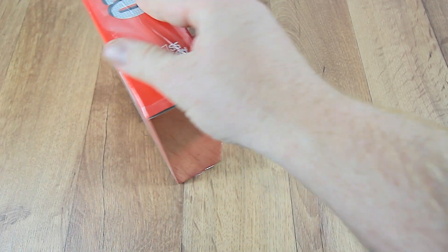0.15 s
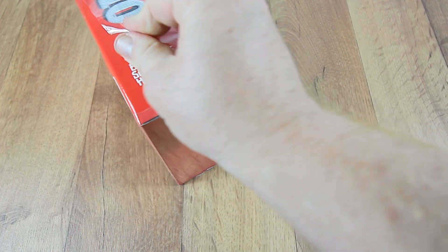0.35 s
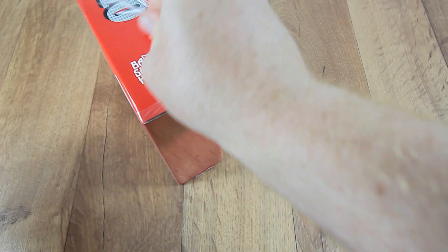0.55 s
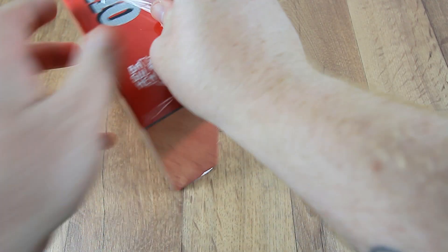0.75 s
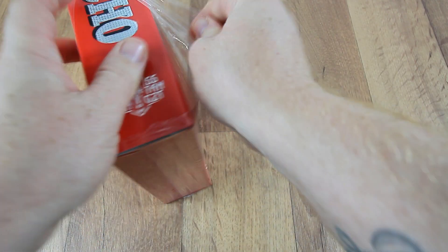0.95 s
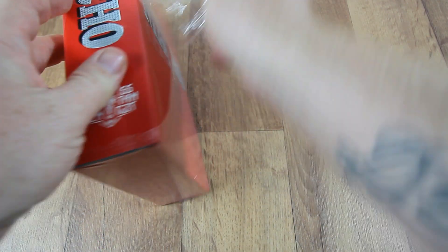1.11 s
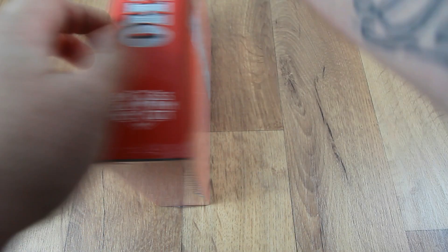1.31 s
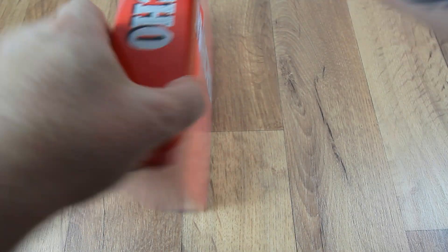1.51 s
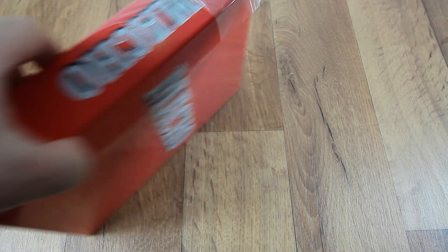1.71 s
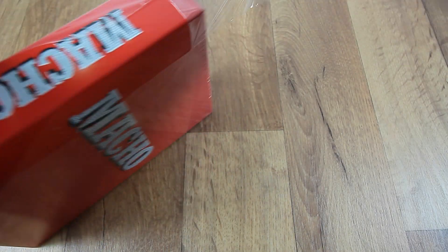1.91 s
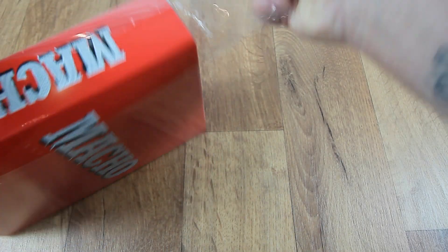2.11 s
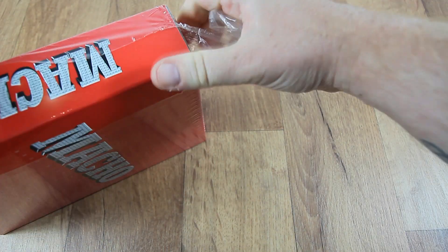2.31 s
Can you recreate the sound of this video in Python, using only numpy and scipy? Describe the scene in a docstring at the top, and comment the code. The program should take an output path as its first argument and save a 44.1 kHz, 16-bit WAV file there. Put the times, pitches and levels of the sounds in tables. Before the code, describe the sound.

Plastic wrap peeled from a hollow cardboard box, close in a small quiet room. Fingers hiss over tight film with small ticks, and a hollow knock on wood lands at 0.4 s with low rumbling. From 0.75 s film crackles in uneven spurts, with duller box bumps near 1.2 and 1.37 s. Brightest crackle and sharp snaps come at 1.63-1.95 s, a hard pop at 1.83, then sparse crinkles until 2.35 s.

```python
"""Peeling film from a hollow box

Fingers slide over a shrink-wrapped cardboard box, tip it against a wooden floor and peel the film off.
Sliding is filtered noise; the film's snaps are noise bursts, its crackle random clicks over friction hiss,
its pops and wrinkles decaying sines. The box knocks and rumbles through a bank of decaying modes.
Close microphone, small quiet room: one floor reflection, a short tail and faint room tone."""
import sys
import numpy as np
from scipy import signal
from scipy.fft import rfft, irfft
from scipy.io import wavfile
from scipy.ndimage import uniform_filter1d

SR = 44100
rng = np.random.default_rng(int(sys.argv[2]) if len(sys.argv) > 2 else 0)


def inscribe(sig):
    """Save sig as 16-bit PCM at rate SR to the path in sys.argv[1].

    A 1-D sig is mono; a 2-D sig holds one channel per row.
    Samples are clipped to [-1, 1] before scaling.
    """
    pcm = np.round(np.clip(np.atleast_2d(sig).T, -1, 1) * 32767)
    wavfile.write(sys.argv[1], SR, pcm.astype(np.int16))


N = 103635  # length in samples
TOP_HZ = 15900  # upper limit of the recorder

# crackle of the peeling film in three bands, before the gain of each layer:
# t/s, body level/dB, middle level/dB, treble level/dB
PEEL_LEVELS = [(.735,-87,-61,-60),(.77,-43,-47,-43),(.795,-62,-44,-48),(.825,-42.5,-38.5,-37.5),(.9,-49,-43.5,-38.5),(.98,-62,-52.5,-52),(1.02,-52,-46,-44),(1.08,-52,-47,-44),(1.15,-43.5,-43,-43.5),(1.21,-46,-45.5,-41.5),(1.27,-58,-42.5,-40),(1.34,-57,-45,-39),(1.385,-49,-49.5,-51),(1.46,-60,-44,-39),(1.52,-67,-51,-48.5),(1.6,-57,-43,-41.5),(1.635,-44,-34.5,-32.5),(1.685,-44.5,-37,-31),(1.715,-46,-45.5,-38),(1.8,-79,-49,-50),(1.91,-76,-56,-52),(1.95,-48.5,-50,-50),(2,-81,-47.5,-52),(2.06,-79,-48.5,-44),(2.12,-86,-52,-48.5),(2.165,-79,-57,-57),(2.2,-69,-57,-53),(2.32,-92,-57.5,-56.5),(2.35,-48,-57,-53)]
# spectrum of the box's rumble and thud: f/Hz, relative level/dB
BOX_COLOUR = [(30,-38),(60,-7),(90,-1),(130,6.5),(170,-4.5),(250,4),(380,0),(600,-10),(1000,-14.5),(1600,-14),(3000,-40)]


def undb(db):
    """Amplitude ratio from its logarithmic measure in decibels."""
    return 10 ** (np.asarray(db) / 20)


def unit(x):
    """Normalisation to unit root-mean-square amplitude."""
    return x / np.sqrt(np.mean(x ** 2) + 1e-20)


def curve(rows, axis=1):
    """Amplitude envelope: one dB column of a table, interpolated linearly in dB over time."""
    rows = np.array(rows, float)
    return undb(np.interp(np.arange(N) / SR, rows[:, 0], rows[:, axis]))


def colour(x, points):
    """Minimum-phase spectral shaping: folding the cepstrum makes the filter causal."""
    hz, db = np.array(points, float).T
    f = np.maximum(np.fft.rfftfreq(4096, 1 / SR), 1)
    gain = undb(np.interp(np.log(f), np.log(hz), db))
    cepstrum = irfft(np.log(gain))
    half = len(cepstrum) // 2
    fold = np.r_[1, np.full(half - 1, 2), 1, np.zeros(half - 1)]
    response = irfft(np.exp(rfft(cepstrum * fold)))[:half]
    return signal.fftconvolve(x, response)[:len(x)]


def bands(x):
    """Band-pass analysis of a sound into body, middle and treble."""
    edges_hz = (450, 2000, 6000, 17000)
    return [signal.sosfilt(signal.butter(3, pair, btype="band", fs=SR, output="sos"), x)
            for pair in zip(edges_hz, edges_hz[1:])]


def low_pass(x, hz, order=2):
    """Low-pass filtering: a soft contact excites little treble."""
    return signal.lfilter(*signal.butter(order, hz, fs=SR), x)


def high_pass(x, hz):
    """Radiation efficiency: small surfaces radiate little bass."""
    return signal.lfilter(*signal.butter(2, hz, "high", fs=SR), x)


def add(out, s, x):
    """Superposition of a sound that starts at s seconds."""
    i = max(int(s * SR), 0)
    out[i:i + len(x)] += x[:max(N - i, 0)]


def walk(rate):
    """Band-limited fluctuation of unit rms: random steps at a rate in Hz, smoothed over one step."""
    k = int(SR / rate)
    steps = np.repeat(rng.standard_normal(N // k + 1), k)[:N]
    return unit(uniform_filter1d(steps, k))


def buckles():
    """Clustered Poisson process: tiny clicks in short clumps, many weak and a few strong."""
    buckles_per_s, spread_db = 1500, 4.8
    clumps_per_s, clump_db = 160, 6
    rate = undb(clump_db * walk(clumps_per_s))
    hit = rng.random(N) < buckles_per_s / SR * rate / rate.mean()
    size = np.minimum(rng.exponential(size=N), 3.5)
    return hit * rng.choice([-1, 1], N) * undb(spread_db * size)


def slide():
    """Sliding friction: skin on tight film gives a smooth high hiss with some grain."""
    # fingers on the film, before the gain below: t/s, level/dB
    slide_levels = [(0, -65), (0.015, -60), (0.033, -51), (0.07, -50.5), (0.1, -56.5), (0.13, -45),
                    (0.19, -47.5), (0.22, -43.5), (0.28, -46.5), (0.34, -42), (0.375, -48.5), (0.47, -49),
                    (0.51, -45), (0.6, -46), (0.69, -55.5), (0.74, -55)]
    # spectrum of the friction: f/Hz, relative level/dB
    slide_colour = [(400,-24),(1000,-12),(2200,-11.5),(3200,-8),(4600,-2),(6500,-3),(9000,-8.5),(11500,-4.5),(14500,-7),(16000,-12)]
    gain_db = -1
    friction = rng.standard_normal(N) + unit(buckles())
    hiss = unit(colour(friction, slide_colour))
    sliding = np.arange(N) / SR < slide_levels[-1][0]
    return undb(gain_db) * hiss * curve(slide_levels) * sliding


def box_ring():
    """Modal response of the box to a tap; each place of contact weights the modes anew."""
    # modes of the box, before random scatter: f/Hz, level/dB, t60/s
    box_modes = [(126.8,-11.5,0.25),(148,-14.5,0.35),(215,-10,0.48),(256,-2,0.15),(338,-5,0.1),(371.6,-4,0.1),(416,-9.5,0.13),(507,-5.5,0.21),(569,-11,0.16),(655,1,0.055),(815,7,0.029),(1070,5,0.021),(1180,-18.5,0.0057),(1390,6,0.018)]
    mode_scatter = .004  # standard deviation of the relative detuning
    t = np.arange(SR // 2) / SR
    ring = np.zeros(len(t))
    for k, (hz, db, t60) in enumerate(box_modes):
        weight_db, detune = rng.standard_normal(2)
        decay = undb(db + weight_db - 60 * t / t60)
        mode = decay * np.sin(2 * np.pi * hz * (1 + mode_scatter * detune) * t)
        ring += (-1) ** k * mode  # neighbouring modes start in opposite phase
    return ring


def rub():
    """Stick-slip friction: soft hands shift the hollow box unevenly and it rumbles in its lower modes."""
    # box under the hands, before the gains below: t/s, level/dB
    rub_levels = [(0,-62),(.04,-65.5),(.2,-59),(.3,-60),(.385,-48),(.45,-37),(.55,-49),(.68,-63.5),(.76,-57.5),(.84,-45),(.92,-48),(1.03,-56.5),(1.16,-41.5),(1.29,-62),(1.4,-47),(1.45,-52),(1.52,-52),(1.575,-37.5),(1.68,-49.5),(1.77,-45),(1.81,-60.5),(2.03,-56),(2.15,-68.5),(2.35,-74)]
    rumble_db, ring_db = -2, -6
    flutter_db, flutter_hz = 3, 50.17
    soft_hz = 560  # low-pass of the soft contact
    rumble = unit(colour(rng.standard_normal(N), BOX_COLOUR))
    slips = low_pass(buckles(), soft_hz)
    ring = unit(signal.fftconvolve(slips, box_ring())[:N])
    mix = undb(rumble_db) * rumble + undb(ring_db) * ring
    return mix * curve(rub_levels) * undb(flutter_db * walk(flutter_hz))


def snaps():
    """Snap-through instability: a crease flips with a tick and a brief burst, then the sheet shivers and settles."""
    # single snaps, rms over the first 2 ms: t/s, body level/dB, middle level/dB, treble level/dB
    snap_events = [(0.0333,-54.5,-60,-38),(0.136,-77,-38,-32.5),(0.1477,-81,-33.5,-45),(0.1518,-72,-37,-31.5),(0.2497,-59,-33.5,-22.5),(0.3342,-43.5,-36,-43),(0.3954,-35,-18.5,-29.5),(0.4009,-32,-27,-35),(0.4838,-48,-34.5,-57),(0.495,-41,-33,-33),(0.523,-46,-56,-30.5),(.5504,-47,-27.5,-31),(0.5637,-44.5,-35.5,-45),(0.6208,-61,-44,-33.5),(0.7104,-70,-47,-40.5),(0.81,-28,-27,-22),(0.813,-31.5,-47,-45),(0.8452,-34.5,-35,-39),(1.007,-34,-33,-32.5),(1.057,-62,-54,-25.5),(1.086,-40,-30.5,-29),(1.099,-39.5,-40,-38),(1.1448,-57,-43,-35),(1.36,-49,-36,-33.5),(1.4034,-47,-35,-28),(1.451,-62,-36.5,-31),(1.484,-40,-32,-32.5),(1.5266,-40,-34.5,-31),(1.5353,-51,-36,-24),(1.6414,-33,-26.5,-14.5),(1.663,-36.5,-24.5,-18),(1.76,-39,-24.5,-19.5),(1.768,-33.5,-34,-21.5),(1.7758,-33.5,-27.5,-14.5),(1.8333,-37,-22,-14.5),(1.9285,-34,-22.5,-19),(1.945,-52,-30,-33),(1.961,-44,-34,-40),(2.0057,-56,-41,-28.5),(2.0254,-40,-25.5,-24.5),(2.033,-40,-32.5,-23.5),(2.062,-55,-38.5,-42),(2.1817,-54,-45.5,-37),(2.2262,-57,-34,-31.5),(2.3414,-45,-37,-31)]
    # spectrum of a snap: f/Hz, relative level/dB
    snap_colour = [(400,-12),(1000,-3.5),(2100,-9),(4000,4.5),(6300,0),(9000,4),(12000,9),(14000,3.5),(16000,0.5)]
    tick = 1.2 * np.sqrt(2)  # amplitude of the first sample
    burst_s, after_db, after_s = .00027, -23, .002  # times to fall to 1/e
    settle_per_s, settle_db, settle_s = 600, 0.5, 0.0047
    out, t = np.zeros(N), np.arange(2048) / SR
    first = int(.002 * SR)
    for s, *levels in snap_events:
        ticks = rng.random(len(t)) < settle_per_s / SR
        settle = ticks * undb(settle_db) * np.exp(-t / settle_s)
        shiver = undb(after_db) * np.exp(-t / after_s)
        burst = rng.standard_normal(len(t)) * (np.exp(-t / burst_s) + shiver + settle)
        burst[0] = tick
        for db, part in zip(levels, bands(colour(burst, snap_colour))):
            add(out, s, undb(db) * part / np.sqrt(np.mean(part[:first] ** 2)))
    return out


def knocks():
    """Impact excitation: the box bumps the floor with a push, its modes, a dull thud and the struck panel's note."""
    # knocks, before the gain below: t/s, level/dB, low-pass f/Hz, panel f/Hz, panel share/dB
    knock_events = [(0.334,-37,800,391,1),(0.3957,-21,1330,1092,-5.5),(.411,-40,500,330,0),(0.429,-35,900,310,0),(.452,-40.5,900,550,0),(.487,-37,604,407,-1.5),(.85,-44.5,300,130,-4),(1.135,-46,600,202,6),(1.165,-41.5,800,234,-8),(1.202,-34.5,404,224,3),(1.316,-38.5,900,107,-3),(1.372,-28.5,570,284,-3),(1.379,-39,1000,743,-5),(1.46,-43,396,315,-5),(1.586,-42,296,240,-16),(1.61,-41,496,348,-2),(1.685,-45,200,100,2),(1.77,-44.5,880,156,2)]
    gain_db = -2
    push_hz, push_db, push_s, push_low_hz = 436, 15.5, 0.0015, 173
    thud_db, thud_s = -3.5, 0.054
    panel_s, panel_split = 0.0083, 0.047  # time to fall to 1/e, relative offset of the side partials
    out, first = np.zeros(N), int(.02 * SR)
    for s, db, bright_hz, panel_hz, panel_db in knock_events:
        ring = box_ring()
        t = np.arange(len(ring)) / SR
        pulse = np.sin(2 * np.pi * push_hz * t) * np.exp(-t / push_s)
        push = undb(push_db) * high_pass(pulse, push_low_hz)
        rumble = unit(colour(rng.standard_normal(len(t)), BOX_COLOUR))
        thud = undb(thud_db) * rumble * np.exp(-t / thud_s)
        body = low_pass(push + ring / np.std(ring[:first]) + thud, bright_hz)
        partials = [np.sin(2 * np.pi * panel_hz * (1 + side * panel_split) * t) for side in (-1, 0, 1)]
        panel = sum(partials) * np.exp(-t / panel_s)
        x = body / np.std(body[:first]) + undb(panel_db) * panel / np.std(panel[:first])
        add(out, s, undb(db + gain_db) * x / np.std(x[:first]))
    return out


def peel():
    """Buckling and friction: film crackles in spurts, each click with its own tint, and hisses over the card."""
    # spectrum of the peeling film: f/Hz, relative level/dB
    peel_colour = [(250,-11.5),(500,8.5),(1000,-6.5),(2000,-7),(4000,-6.5),(6500,-3.5),(9000,0),(12500,3.5),(14500,0.5),(16000,-8.5)]
    crackle_db, friction_db = (-4, -4, -2.5), (-11.5, -5, -5.5)  # body, middle, treble
    flutter_db, flutter_hz = 2.5, 70
    tint_db = 8  # scale of each click's random gain in a band
    clicks, spurts = buckles(), undb(flutter_db * walk(flutter_hz))
    hiss = bands(colour(rng.standard_normal(N), peel_colour))
    out = np.zeros(N)
    for k in range(len(hiss)):
        tinted = clicks * undb(tint_db * rng.uniform(-0.71, 1, N))
        crackle = bands(colour(tinted, peel_colour))[k]
        mix = undb(crackle_db[k]) * unit(crackle) + undb(friction_db[k]) * unit(hiss[k])
        out += curve(PEEL_LEVELS, axis=k + 1) * mix
    peeling = np.arange(N) / SR > PEEL_LEVELS[0][0]
    return out * spurts * peeling


def wrinkles():
    """Damped free vibration: larger wrinkles flip at random in the peel, each ringing briefly at its own pitch."""
    count = int(450 * N / SR)
    low_hz, high_hz = 870, 5600
    decay_cycles = 1.6  # cycles to fall to 1/e
    spread_db, gain_db = 4, -8
    out, t = np.zeros(N), np.arange(512) / SR
    start, end = PEEL_LEVELS[0][0], PEEL_LEVELS[-1][0]
    for when, pitch, size in rng.random((count, 3)):
        hz = low_hz * (high_hz / low_hz) ** pitch
        db = spread_db * min(-np.log(1 - size), 3)
        ring = np.sin(2 * np.pi * hz * t) * np.exp(-hz * t / decay_cycles)
        # the root of pitch offsets the shorter ring of high wrinkles
        add(out, start + when * (end - start), undb(db) * np.sqrt(hz) * ring)
    return undb(gain_db) * unit(out) * curve(PEEL_LEVELS, axis=2)


def pops():
    """Membrane vibration: taut film lets go with a short crack and rings for milliseconds like a tiny drumhead."""
    # hollow pops, before gain and scatter: t/s, level/dB, pitch f/Hz,
    # bass limit f/Hz (higher where the film has left the card)
    pop_events = [(.776,-18,2920,890),(0.8052,-19.5,2320,593),(0.9794,-31,2880,600),(1.0045,-28,2400,500),(1.2331,-25.5,3600,900),(1.5725,-20,3670,600),(1.5975,-20,2680,606),(1.8334,-11.5,3930,3100),(1.9287,-16,4380,2290),(1.9435,-30,4200,2500)]
    # modes of the taut film: ratio to the pitch, level/dB, t60/s
    film_modes = [(.27,-22,0.0057),(.42,-9,0.008),(.6,-16,0.0042),(.85,-1,0.0052),(1,8,0.0044),(1.25,4,0.0056),(1.65,1,0.0034),(2.2,-18,0.0022)]
    gain_db, crack_db, crack_s = 6, -19, .0004
    scatter = .03  # standard deviation of the relative detuning
    top_ratio = 1.84  # low-pass cutoff over pitch
    out, t = np.zeros(N), np.arange(1024) / SR
    for s, db, pitch_hz, low_hz in pop_events:
        ring = np.zeros(len(t))
        for ratio, mode_db, t60 in film_modes:
            hz = pitch_hz * ratio * (1 + scatter * rng.standard_normal())
            ring += undb(mode_db - 60 * t / t60) * np.sin(2 * np.pi * hz * t)
        ring = low_pass(ring, top_ratio * pitch_hz, order=4)
        crack = undb(crack_db) * rng.standard_normal(len(t)) * np.exp(-t / crack_s)
        add(out, s, undb(db + gain_db) * high_pass(ring / np.abs(ring).max() + crack, low_hz))
    return out


def room(x):
    """Reflection and reverberation: one bounce off the floor, then a short tail whose treble dies first."""
    floor_lag_s, floor_gain = .0028, .14
    # band edges in Hz, level in dB, t60 in s
    tails = [((350, 3200), -10.5, 0.23), ((3200, 17000), -14.5, .2)]
    t = np.arange(SR // 2) / SR
    response = np.zeros(len(t))
    response[0], response[int(floor_lag_s * SR)] = 1, floor_gain
    for edges_hz, db, t60 in tails:
        tail = rng.standard_normal(len(t)) * np.exp(-np.log(1000) * t / t60) * (t > floor_lag_s)
        tail /= np.linalg.norm(tail)
        response += undb(db) * signal.lfilter(*signal.butter(2, edges_hz, "band", fs=SR), tail)
    return signal.fftconvolve(x, response)[:N]


def room_tone():
    """Stationary background noise: a faint steady tone of the room."""
    # spectrum of the room tone: f/Hz, relative level/dB
    tone_colour = [(25, -36), (130, 14), (300, 11), (1000, -2), (5000, -5), (16000, -60)]
    return undb(-67.5) * unit(colour(rng.standard_normal(N), tone_colour))


def scene():
    """Superposition of film and box in the room, over faint room tone."""
    hands = slide() + rub()
    film = snaps() + peel() + wrinkles() + pops()
    return (room(hands + film + knocks()) + room_tone())[None]


def record(dry):
    """Band limitation: the recorder cuts the top with a steep elliptic low-pass."""
    return signal.sosfilt(signal.ellip(8, .2, 70, TOP_HZ, fs=SR, output="sos"), dry)


dry = scene()
out = record(dry)
inscribe(out)
```